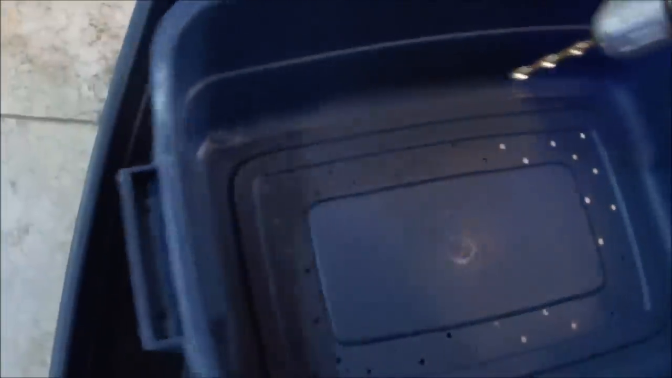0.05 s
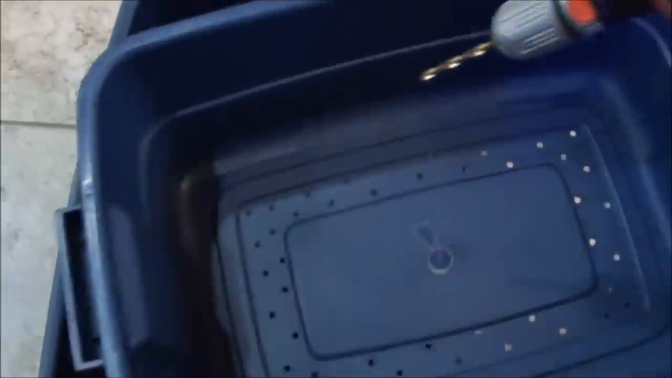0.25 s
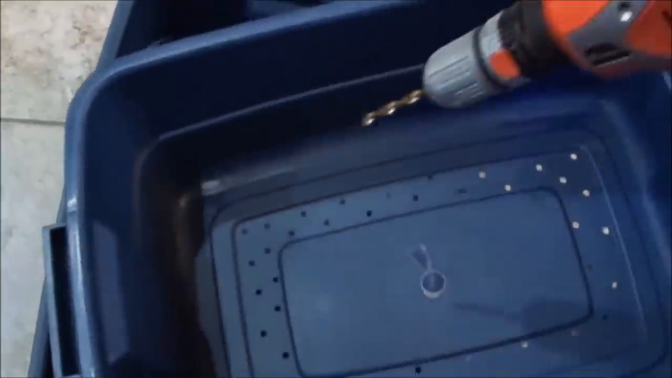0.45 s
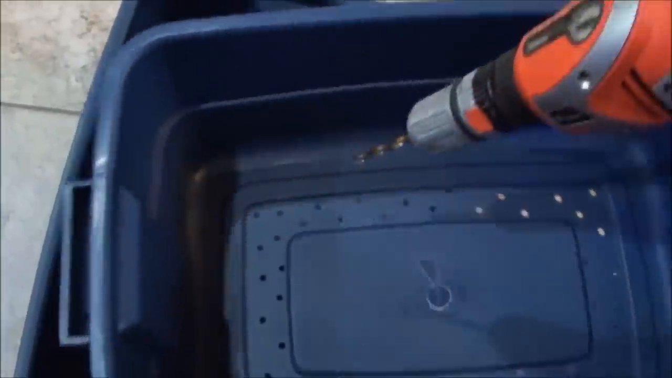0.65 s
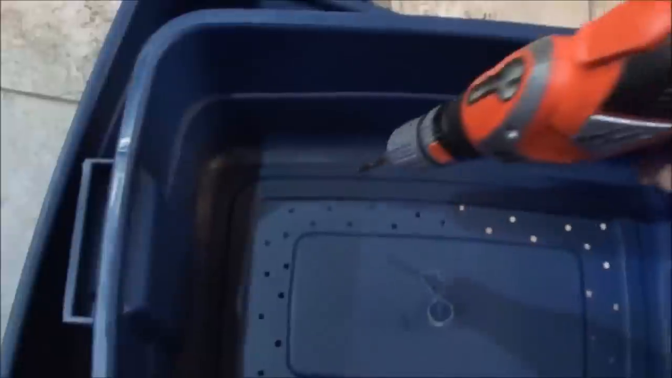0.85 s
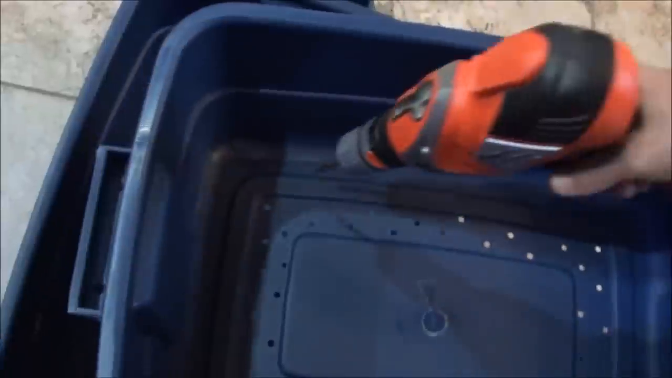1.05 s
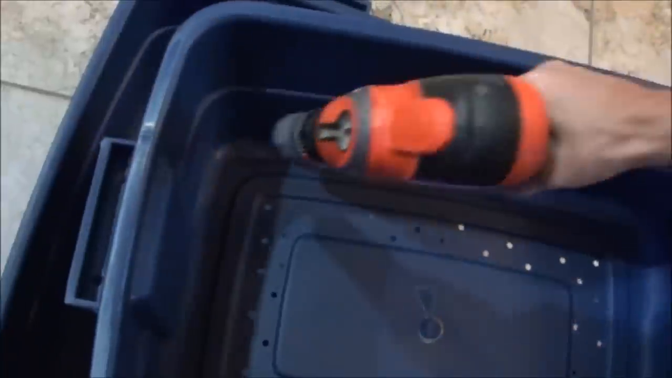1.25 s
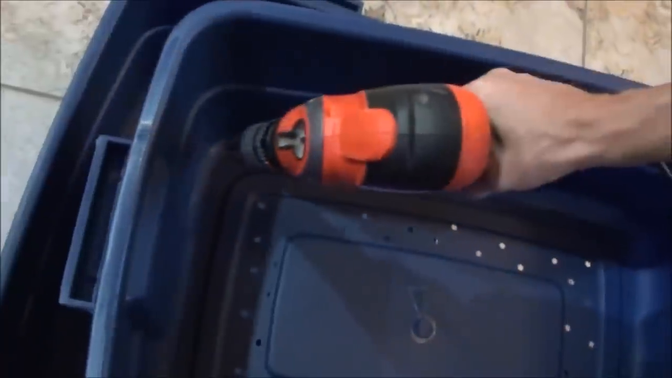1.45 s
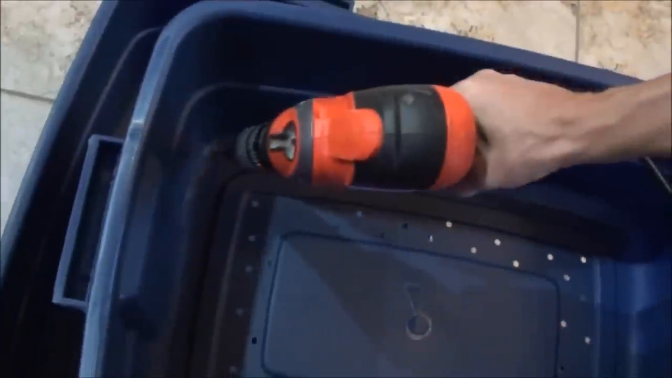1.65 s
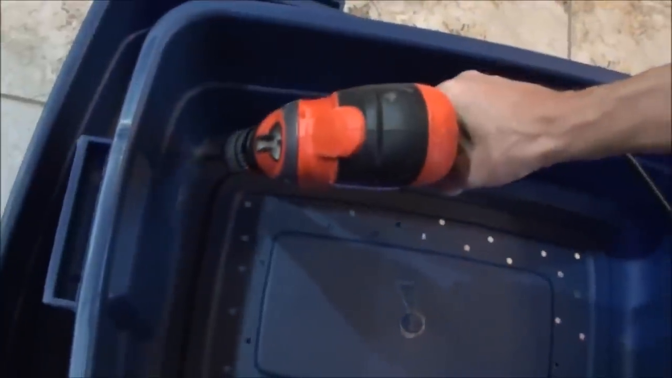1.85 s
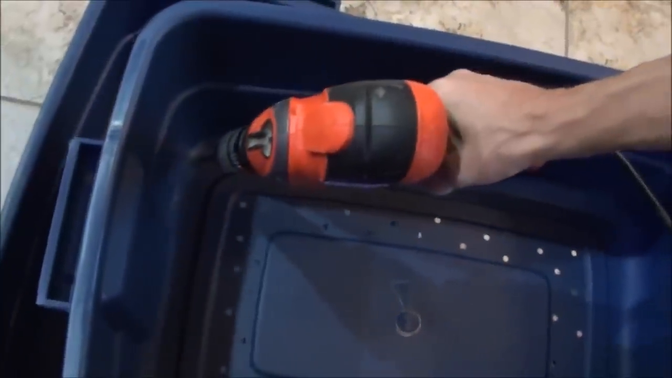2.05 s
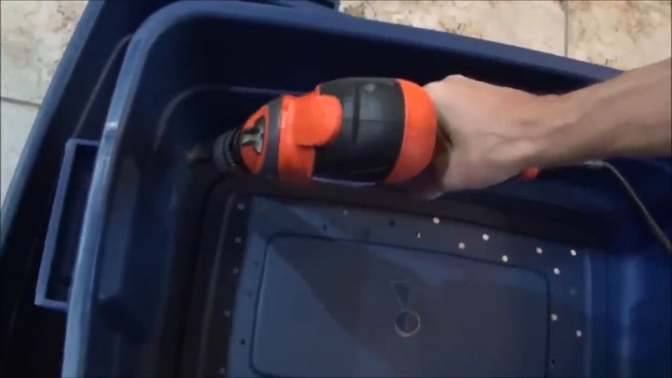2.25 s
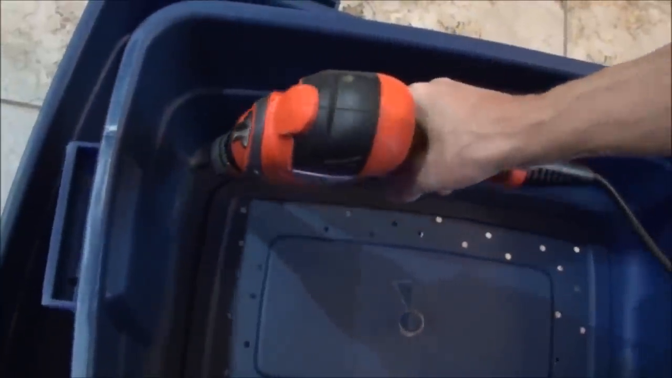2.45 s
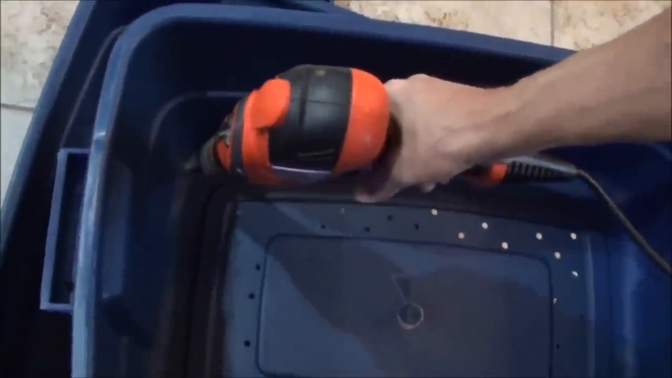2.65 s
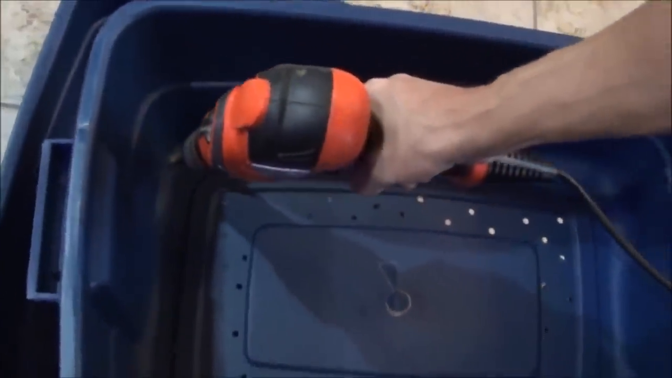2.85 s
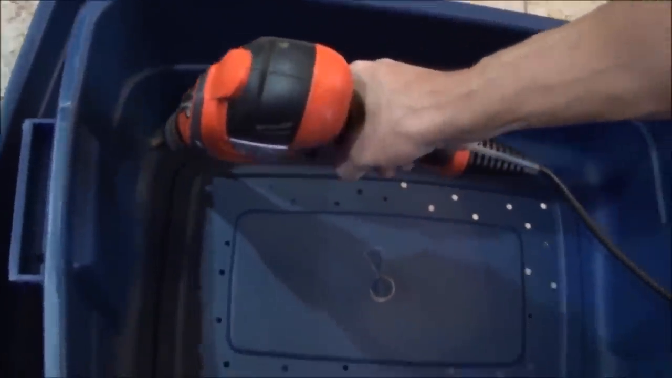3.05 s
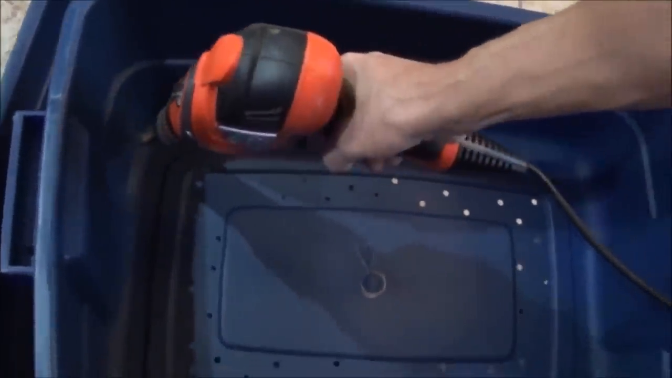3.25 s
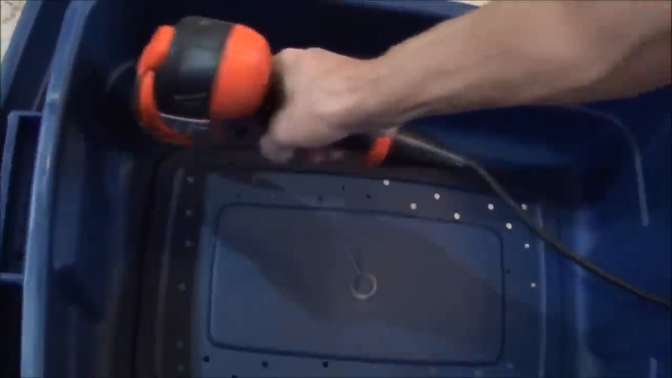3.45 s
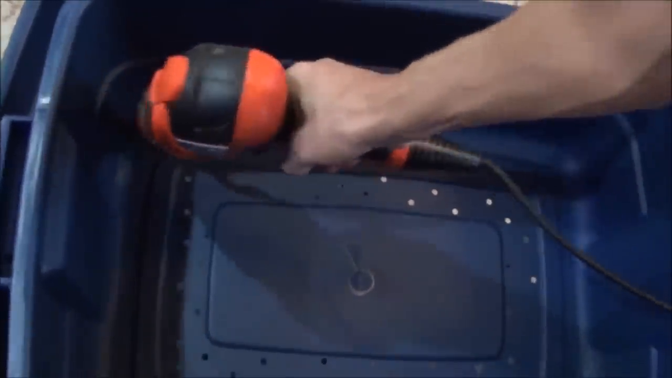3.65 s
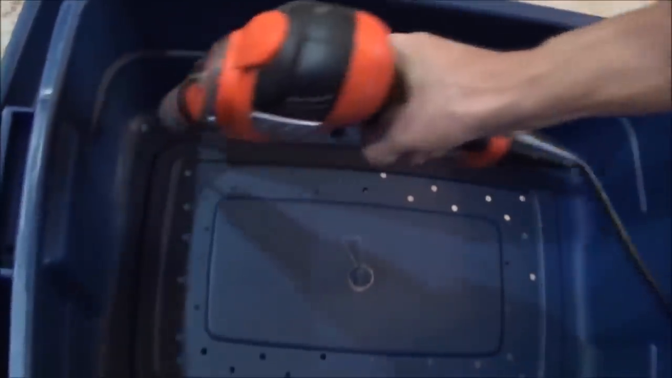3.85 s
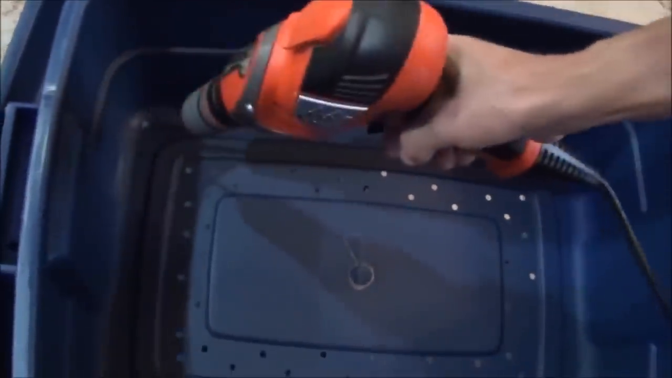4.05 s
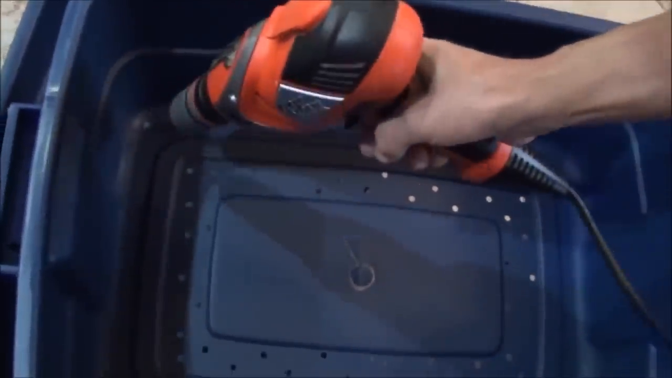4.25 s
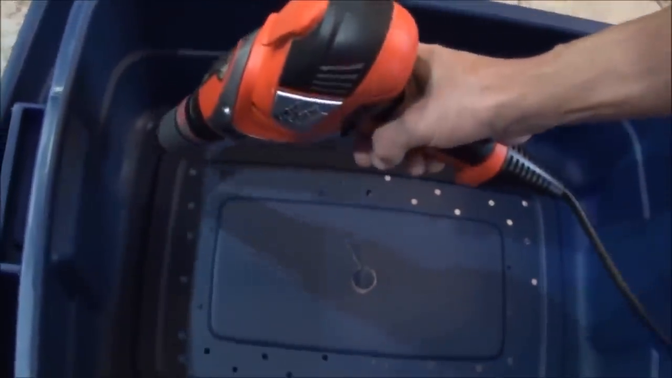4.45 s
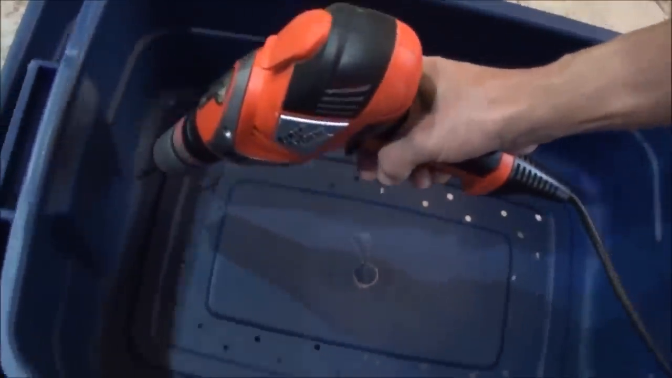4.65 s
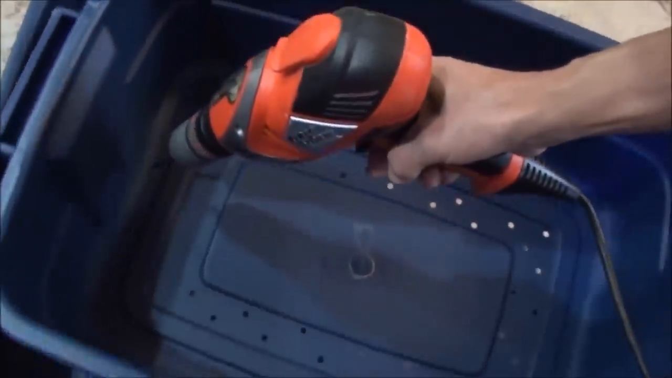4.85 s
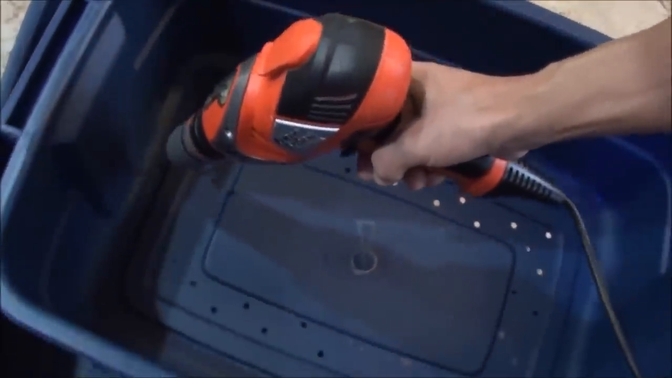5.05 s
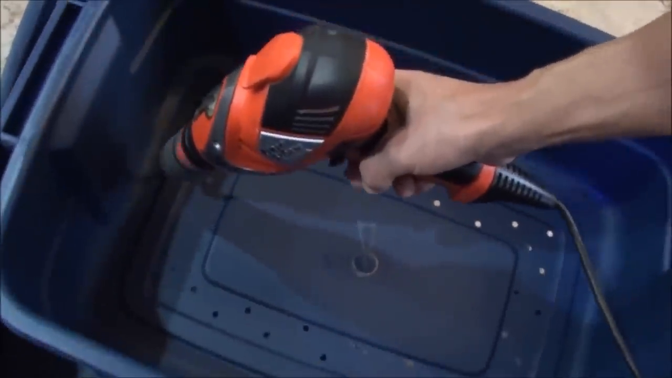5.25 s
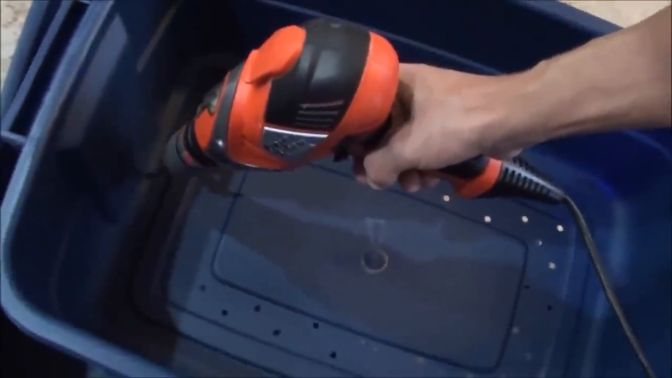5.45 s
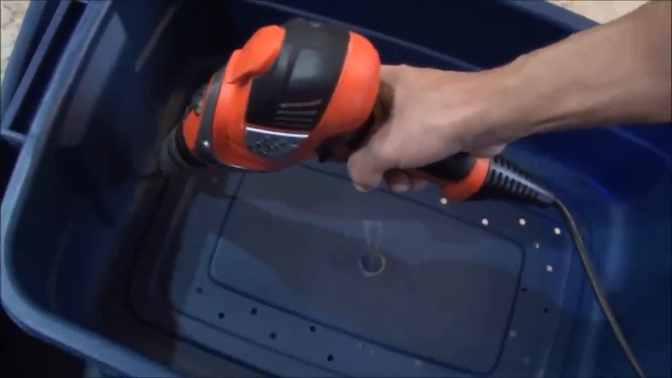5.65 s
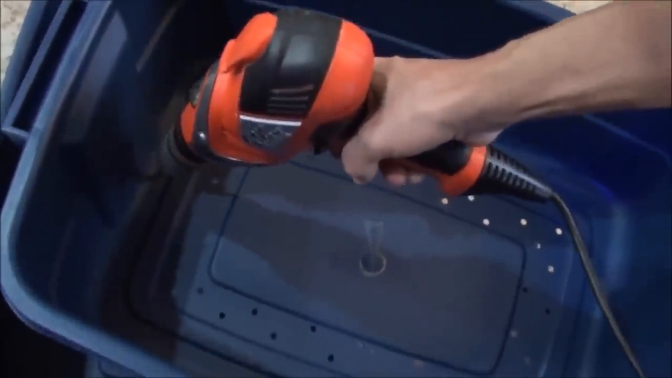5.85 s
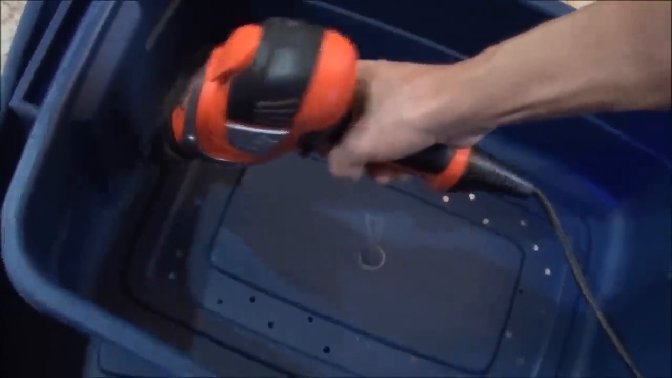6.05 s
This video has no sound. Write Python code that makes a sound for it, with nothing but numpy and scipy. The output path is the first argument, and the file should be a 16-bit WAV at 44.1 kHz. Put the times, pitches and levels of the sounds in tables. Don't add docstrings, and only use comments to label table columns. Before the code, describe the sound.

A drill bumps around a plastic bin over a quiet room, clicks, spins up to a loud shrill whir, winds down, then starts again.

```python
import sys
import numpy as np
from scipy import signal
from scipy.fft import rfft, irfft
from scipy.io import wavfile
from scipy.ndimage import uniform_filter1d

SR = 44100
rng = np.random.default_rng(int(sys.argv[2]) if len(sys.argv) > 2 else 0)


def unload_audio(sound):
    columns = np.transpose(np.atleast_2d(sound))
    steps = np.round(np.clip(columns, -1, 1) * 32767)
    wavfile.write(sys.argv[1], SR, steps.astype(np.int16))


def decibels_to_gain(level_db):
    exponent = np.asarray(level_db, float) / 20
    return 10 ** exponent


N = 269451
T = np.arange(N) / SR
HZ = np.fft.rfftfreq(N, 1 / SR)


def evened(x):
    return x / np.sqrt(np.mean(x ** 2) + 1e-20)


def read(points, hz=HZ):
    f, value = np.transpose(points)
    return np.interp(np.log(hz + 1), np.log(f + 1), value)


def curves(rows):
    s, *columns = np.transpose(rows)
    return [np.interp(T, s, c) for c in columns]


def add(mix, s, sound):
    part = mix[round(s * SR):][:len(sound)]
    part += sound[:len(part)]


def drift(hz):
    noise = uniform_filter1d(rng.standard_normal(N), int(SR / hz / 4))
    return evened(signal.lfilter([1], [1, -np.exp(-2 * np.pi * hz / SR)], noise))


def above(x, hz):
    return signal.lfilter(*signal.butter(3, hz, "high", fs=SR), x)


def resonate(x, hz, width):
    r = np.exp(-np.pi * width / SR)
    return signal.lfilter([1 - r], [1, -2 * r * np.cos(2 * np.pi * hz / SR), r * r], x)


def bump(hz, center, width):
    return 1 / (1 + (2 * (hz - center) / width) ** 2)


def pair(left, other, same):
    c = np.clip(read(same), 0, 1)
    return np.array([left, c * left + np.sqrt(1 - c ** 2) * other])


def banded(spectra, edges_hz, levels_db, span):
    lows = [0] + [1 / (1 + (HZ / e) ** 8) for e in edges_hz] + [1]
    bands = [irfft(spectra * np.sqrt(abs(b - a)), N) for a, b in zip(lows, lows[1:])]
    return sum(decibels_to_gain(db) * band / band[:, span].std() for db, band in zip(levels_db, bands))


def echoes(x, t60=.09, wet_db=-5, dull_hz=12000, rattle_db=0):
    taps = np.zeros((2, 8000))
    at = np.arange(60, 7960, 20) + rng.integers(0, 20, (2, 395))
    np.put_along_axis(taps, at, rng.choice([-1., 1.], at.shape) * decibels_to_gain(-60 * at / SR / t60), 1)
    taps = taps[0] + 0.89 * taps
    taps = signal.lfilter(*signal.butter(1, min(dull_hz, 20000), fs=SR), taps)
    taps *= decibels_to_gain(wet_db) / np.linalg.norm(taps[0])
    tail = signal.fftconvolve(x[None], taps, axes=1)[:, :N]
    return x + tail * decibels_to_gain(rattle_db * (drift(235) - 0.74))


# (time [s], trigger [0-1])
POWER = [
    (2.76, 1),
    (4.07, 1),
    (4.12, 0),
    (5.85, 0),
    (5.89, 1),
    (6.11, 1),
]
EDGES_HZ = [700, 2500, 10000]


def drill():
    hz = uniform_filter1d(speed(), 3000)
    power, = curves(POWER)
    running = T > SPIN_UP[0][0]
    unsteady = (.0004 + .0028 * power) * drift(60)
    turns = np.cumsum(hz * (1 + unsteady)) / SR / 40
    strain = power / (1 + (hz / 7000) ** 8)
    lines, wobble = shaft_tones(turns, hz, power, strain)
    body = housing(brush_hiss(turns, hz, power), lines, hz) + wobble
    sung = echoes(decibels_to_gain(3.5) * whine(turns, hz, power, strain) * running, t60=0.25, wet_db=-8)
    return running * banded(rfft(body), EDGES_HZ, parts_db(hz), running) + sung


# (time [s], whine [Hz])
SPIN_UP = [(2.76, 300), (2.95, 3520), (3.13, 6720), (3.2, 7540), (3.5, 11610), (3.6, 12540), (3.75, 13590),
           (3.9, 14390), (4.09, 15122)]
# (time [s], whine [Hz])
RESTART = [(5.87, 4350), (6.0, 7250), (6.065, 8900), (6.11, 9750)]


def speed():
    (up,), (again,), (off_s, off_hz) = curves(SPIN_UP), curves(RESTART), SPIN_UP[-1]
    equal_hz, coast_per_s = 11640.6, .312493
    angle = np.arctan(off_hz / equal_hz) - coast_per_s * np.maximum(T - off_s, 0)
    coast = equal_hz * np.tan(angle)
    return np.where(T < off_s, up, np.where(T < RESTART[0][0], coast, again))


# (frequency [Hz], level [dB])
VENT = [(1000, -58), (3500, -9), (5100, -29.5), (6000, -19), (7000, -15), (9700, -14), (10500, -20),
        (15000, -23)]
# (frequency [Hz], width [Hz], boost [dB])
VENT_MODES = [(4600, 250, 4), (5500, 150, 6), (6350, 250, 5), (6800, 200, 5), (7400, 300, 6),
              (8020, 200, 7), (8850, 200, 5), (9320, 300, 6), (10350, 200, 6), (11250, 150, 6),
              (11650, 250, 8), (12150, 300, 9), (13250, 300, 9), (14350, 350, 9)]
# (time [s], depth [dB], length [s])
DROPS = [(2.95, 9, .04), (3.058, -5, 0.045), (3.302, 1.5, .07), (3.498, -1, .03), (3.86, 1, 0.061),
         (4.015, 12, .012), (4.25, 3, 0.018), (4.34, -6, .015), (4.61, 3, 0.039), (4.643, 1, 0.011),
         (4.725, 7, 0.015), (4.898, 3, .012), (5.053, 1.5, .015), (5.283, 15, 0.019), (5.504, 0.5, 0.018),
         (5.54, 6, 0.019), (5.67, 5, 0.037), (5.98, 6, .025), (6.035, -4.5, .03), (6.1, 5, 0.027)]


def whine(turns, hz, power, strain):
    db = read(VENT, hz) + sum(boost * bump(hz, f, w) for f, w, boost in VENT_MODES)
    db += -8.5 * power / (1 + (hz / 13600) ** 4)
    db += curves(MESH)[0] - 2 * 2.5 * strain
    db -= sum(depth * np.exp(-((T - s) / length) ** 4) for s, depth, length in DROPS)
    return decibels_to_gain(db + (1.5 + 2.5 * power) * drift(40)) * np.cos(2 * np.pi * 40 * turns)


# (times per turn, level [dB])
GEAR = [(9, -19), (12, -24), (18, -17.5), (27, -20), (36, -19)]
# (times per turn, level
# [dB])
BARS = [(12, -30), (16, -32), (24, -24), (36, -19.5), (41, -22), (48, -21), (60, -22), (72, -18), (80, -14),
        (84, -18)]
# (time [s], level [dB])
MESH = [
    (5.8, 0),
    (5.86, -8),
    (5.95, -7),
    (6.01, 0),
    (6.06, -2),
]
# (times per turn, time [s], length [s], change [dB])
TONE_SWELLS = [(9, 2.95, .05, -8), (27, 2.97, .04, -6), (27, 3.32, .1, -9), (27, 3.56, .07, 5),
               (18, 3.68, .06, 9), (36, 3.48, .1, -7), (12, 3.2, .04, 6), (18, 3.37, .05, 4),
               (18, 3.52, .07, -7), (18, 6.0, .05, -8), (80, 5.8, .06, -9), (36, 5.45, .08, -5),
               (24, 4.85, .12, -5), (24, 5.32, .08, 7), (36, 4.62, .2, -6), (36, 5.23, .04, 3),
               (48, 5.52, .03, 6), (36, 5.72, .08, 6), (36, 5.85, .03, -6), (12, 6.05, .04, 9),
               (18, 6.09, .04, 2), (36, 6.09, .04, 5), (27, 6.03, .06, -7), (18, 3.45, .04, -6),
               (18, 3.27, .03, -5), (18, 3.2, .02, -4), (12, 3.3, .05, 5), (9, 3.17, .06, -4),
               (18, 3.32, .03, -5), (16, 4.77, .06, 10), (24, 5.12, .08, -7), (24, 5.46, .05, 5),
               (36, 5.03, .04, 4), (12, 5.96, .05, -5), (72, 5.82, .07, -8), (84, 5.82, .07, -8),
               (24, 5.31, .05, 5), (18, 6.07, .02, 5), (36, 6.07, .03, 3), (12, 3.02, .05, 4),
               (18, 3.23, .04, 4)]


def shaft_tones(turns, hz, power, strain):
    flutter, shake = drift(30), drift(90)

    def order(k, db):
        change_db = sum(d * np.exp(-((T - s) / length) ** 2) for o, s, length, d in TONE_SWELLS if o == k)
        level = decibels_to_gain(db + change_db + (1.6 - .2 * power) * np.roll(flutter, 997 * k))
        phase = 2 * np.pi * k * turns + .85 * power * np.roll(shake, 1499 * k)
        return level * np.cos(phase) * (k * hz / 40 < 16000)

    teeth = power * decibels_to_gain(2.5 * strain + curves(MESH)[0]) * sum(order(*o) for o in GEAR)
    bars = (1 - power) * sum(order(*o) for o in BARS)
    wobble = (1 - power) * order(2, -21.5) / (1 + (11500 / hz) ** 8)
    return teeth + bars, wobble


# (frequency [Hz], likeness [0-1])
SAME_DRILL = [(60, 0.97), (180, 0.98), (550, 0.94), (1650, 1), (2500, 0.91), (4970, 0.92), (8500, 0.92),
              (11000, 1), (15000, 1)]


def brush_hiss(turns, hz, power):
    throb = 1 + 0.086 * np.cos(2 * np.pi * turns) + 0.095 * np.cos(8 * np.pi * turns)
    mains_depth = 0.39 * power / (1 + (hz / 3800) ** 2)
    throb *= 1 + mains_depth * np.cos(2 * np.pi * 119.8 * T)
    sparks = decibels_to_gain((-0.4 + 0.5 * power) * drift(320) + 1.0 * drift(31))
    return pair(*rfft(rng.standard_normal((2, N)) * throb * sparks), SAME_DRILL)


# (frequency [Hz], level [dB per Hz])
HISS = [(35, -72), (60, -42), (86, -32), (359, -14), (709, -13), (831, -9), (1340, 0), (1920, -6.5),
        (4350, -3), (5330, 1), (8020, 3), (13500, -17)]
# (frequency [Hz], width [Hz], boost [dB])
HOUSING = [(696, 184, 4), (996, 63, 2.5), (1510, 910, 5), (2080, 320, 2.5), (3000, 1200, 1.5),
           (4366, 1270, 6), (5990, 120, 4), (6000, 5700, -5.5), (6140, 940, 0), (7240, 340, 4.5),
           (8000, 110, 2.5), (9300, 130, 5.5), (11730, 330, 5.5), (14100, 550, 5)]


def housing(hiss, lines, hz):
    def shell(depth, shift=1):
        modes_db = sum(db * bump(HZ, f * shift, w) if shift == 1 else
                       db / (1 + (2 * (HZ - f * shift) / w) ** 2) for f, w, db in HOUSING)
        return evened(decibels_to_gain(read(HISS) + depth * modes_db))

    grip_shift, grip_per_s = .025, 3
    grip = .5 + .5 * np.tanh(drift(grip_per_s))
    bare = grip * irfft(hiss * shell(2.47, 1 - grip_shift), N)
    bare += (1 - grip) * irfft(hiss * shell(2.8, 1 + grip_shift), N)
    most_wind = .9 + 0.074 * np.tanh(drift(5.8))
    wind = np.clip((hz - 2500) / 7000 + 0.23 * drift(4.9), 0, most_wind)
    body = np.sqrt(1 - wind) * bare + np.sqrt(wind) * irfft(hiss * shell(0.83), N)
    clear = 1.7 * np.exp(-((hz - 8500) / 5800) ** 2)
    return body + clear * irfft(rfft(lines) * shell(1.5) * decibels_to_gain(3), N)


# (time [s], motor level [dB], bit pressure [0-1])
WORK = [(2.83, -27, 0.44), (2.89, -19, 0), (2.98, -11.5, 0), (3.18, -13.5, 0.22), (3.28, -16, 0.26),
        (3.4, -13.5, 0.64), (3.68, -14.5, 0.62), (3.9, -14, 0.98), (4.08, -14.5, 0.57), (4.4, -15, 0.56),
        (4.78, -16, 0.65), (4.9, -18.5, 0.59), (5.2, -20, 0.57), (5.48, -20, 0.44), (5.735, -21.5, 0.2),
        (5.76, -15.5, 0.03), (5.9, -13, 0.01), (6.08, -14.5, 0.1)]
# (level [dB], share of the motor level, added by full pressure [dB])
PARTS = [
    (-36, 0.28, 14.5),
    (-30, 0.53, 5.5),
    (-15, 1, 0.4),
    (-25, 0.98, 1),
]


def parts_db(hz):
    motor_db, pressure = curves(WORK)
    levels = [db + share * (motor_db + 15) + press_db * pressure for db, share, press_db in PARTS]
    rumble, wall, shell, air = levels
    wall = wall + 5 * np.exp(-((T - 4.3) / 0.45) ** 4)
    air = air + 30 * np.minimum(np.log2(hz / 3980), 0)
    return rumble, wall, shell, air


# (time [s], length [s], level [dB], pitch [Hz], width [Hz])
GROANS = [(2.72, 0.35, -36.5, 298, 126), (2.879, 0.22, -21.5, 2930, 570), (5.86, 0.17, -22, 4500, 300),
          (5.89, 0.15, -20, 4300, 300), (5.74, 0.18, -27, 4700, 500), (5.997, 0.12, -21, 2460, 330),
          (4.92, 0.17, -27, 1400, 250), (4.5, 0.19, -29, 1560, 190), (3.499, 0.46, -21.5, 1020, 220),
          (3.56, 0.56, -31, 301, 116), (3.57, 0.15, -45, 135, 40), (5.6, 0.24, -52, 140, 40),
          (4.4, 0.61, -30.5, 816, 130), (2.9, 0.22, -20, 4900, 390), (2.72, 0.49, -23.5, 8050, 260),
          (2.75, 0.074, -34, 8100, 350), (2.75, 0.17, -35, 4750, 400), (2.83, 0.11, -29, 1300, 360),
          (5.753, 0.24, -37.5, 302, 110), (3.953, 0.67, -26, 1417, 170), (4.85, 0.08, -14.5, 9470, 170),
          (5.73, 0.072, -20, 9600, 500), (5.5, 0.36, -24, 9300, 200), (5.73, .16, -28, 6500, 200),
          (5.87, 0.11, -23, 3000, 230), (5.76, .12, -29, 2600, 900), (6.6, .07, -25, 8600, 250),
          (2.75, 0.15, -29.5, 3000, 1100), (5.86, 0.2, -22, 9500, 500), (3.16, 0.12, -26, 2350, 200),
          (3, .2, -27, 3400, 300), (3.14, 0.077, -21, 4900, 200), (2.9, 0.13, -27, 3100, 200),
          (2.96, .11, -26, 4400, 250), (3.05, .07, -27, 1350, 200), (3.98, 0.48, -26, 4450, 250),
          (4.46, .16, -27, 3500, 250), (4.1, 0.21, -30, 700, 91), (4.05, 0.14, -27, 2160, 230),
          (5.12, .4, -35, 9350, 250), (5.1, 0.17, -33, 4300, 300)]


def groans():
    return whistles(GROANS)


# (time [s], level [dB], color [Hz], fade by 60 dB [s])
SNAPS = [(2.629, -13, 3000, 0.073), (2.632, -5.5, 3000, 0.047), (2.636, -1.5, 2800, 0.022),
         (2.757, -7, 4650, 0.023), (2.759, -4, 5250, 0.016), (2.8425, -13, 3500, 0.027),
         (2.859, -12, 3000, 0.023), (2.9106, -7, 6000, 0.079), (5.877, -3, 4730, 0.025)]
# (time [s], level [dB])
CHATTER = [(5.564, -7), (5.581, -13), (5.615, -12), (5.689, -9), (5.733, -13), (5.754, -9), (5.784, -14),
           (5.84, -7), (5.925, -7), (5.944, -9), (5.988, -9), (6.012, -9), (6.06, -9)]
# (time [s], level [dB])
CLASHES = [
    (2.8927, -6),
    (2.916, -1),
    (2.9294, 1),
    (2.958, -2),
    (2.9752, -8),
    (3.034, -9),
]


def gear_snaps():
    snaps = SNAPS + [(s, db, 8000, .04) for s, db in CHATTER]
    snaps = snaps + [(s, db - 6.5, 4000, .02) for s, db in CLASHES]
    return strike([(s, db - 26 * min(3000 / hz, 1) ** -.7, db, hz, t60) for s, db, hz, t60 in snaps])


# (time [s], ring [dB], crack [dB], crack color [Hz], crack fade by 60 dB [s])
KNOCKS = [(.15, -8.5, -1.5, 1330, 0.014), (.259, -24, -13, 250, 0.063), (.494, -25.5, -30, 2000, 0.15),
          (.683, -50, -22, 1500, .05), (.707, -41, -15.5, 2250, 0.24), (.734, -40, -23, 2030, 0.06),
          (.874, -14, -6, 1770, 0.069), (.929, -25, -16, 870, 0.15), (1.075, -24, -34, 800, .06),
          (1.295, -27, -5.5, 1330, 0.02), (2.031, -39, -33, 1200, 0.12), (5.432, -48, -19.5, 171, 0.4)]


def knocks():
    return strike(KNOCKS)


# (frequency [Hz], level [dB], decay value [s]; a mode fades by 60 dB in 0.38 times
# this, at most 0.2 s)
TUB = [(319, 5.5, 0.22), (509, 9, 0.12), (748, -6, 0.32), (1020, 4.5, 0.098), (1380, 7, 0.075),
       (1830, 21, 0.02)]


def strike(blows):
    out, t = np.zeros(N), T[:8000]
    shifts = rng.uniform(.96, 1.04, (len(blows), len(TUB)))
    noises = rng.standard_normal((len(blows), 8000))
    for (s, ring_db, crack_db, hz, t60), noise, shift in zip(blows, noises, shifts):
        ring = sum(decibels_to_gain(d - 60 * t / min(0.38 * decay, .2)) * np.sin(2 * np.pi * f * k * t)
                   for (f, d, decay), k in zip(TUB, shift))
        crack = evened(above(resonate(noise, min(hz, 15000), 3.0 * hz), 0.18 * hz))
        crack = crack * (decibels_to_gain(-60 * t / t60) + 1.17 * decibels_to_gain(-60 * t / 0.01))
        ring = decibels_to_gain(ring_db - 2.5) * ring * np.minimum(t / 0.0052, 1)
        add(out, s, ring + decibels_to_gain(crack_db - 5.0) * crack * np.minimum(t * hz / 1.9, 1))
    return signal.lfilter(*signal.butter(2, 9500, fs=SR), out)


# (time [s], length [s], level [dB], pitch [Hz],
# width [Hz])
SQUEAKS = [(.688, 0.062, -17, 1980, 900), (.698, 0.039, -16.5, 300, 83), (2.3, 0.063, -38, 240, 130),
           (2.63, 0.088, -38.5, 130, 97), (.2, .2, -32, 290, 80), (.255, .03, -26, 520, 150),
           (1.297, 0.028, -27, 450, 350), (2.63, 0.068, -35.5, 187, 75), (.248, 0.035, -19, 340, 140),
           (.95, 0.091, -23.5, 1970, 2400), (1.293, 0.0087, -15.5, 1400, 790), (.16, 0.12, -32, 770, 120),
           (.732, 0.049, -20, 307, 75), (1.5, 0.09, -43, 3030, 450), (1.4, 0.09, -45, 4500, 350),
           (1.47, 0.12, -41, 6400, 1300), (2, 0.12, -46, 4640, 600), (2, .1, -49, 6700, 500),
           (2.2, .12, -48, 5500, 900), (2.282, 0.092, -39, 3610, 220), (2.36, 0.098, -47, 3600, 150),
           (2.558, 0.064, -40, 3600, 200), (2.564, .06, -42, 6500, 900)]


def squeaks():
    return whistles(SQUEAKS)


def whistles(rows):
    out, lumps = np.zeros(N), decibels_to_gain(1.8 * drift(60) - 1)
    for (s, length, db, hz, width), noise in zip(rows, rng.standard_normal((len(rows), SR))):
        n = int(length * SR)
        tone = resonate(resonate(noise[:n + 2000], hz, width), hz, width)[2000:]
        swell = signal.windows.tukey(n, .9) * lumps[int(17 * hz) % SR:][:n]
        add(out, s, decibels_to_gain(db) * evened(tone) * swell)
    return out


# (time [s], level [dB])
DRAG = [(0, -33), (.11, -35), (.318, -31.5), (.6, -35), (.65, -31.5), (.866, -34), (.918, -27),
        (1.086, -32.5), (1.25, -40), (1.456, -36), (1.624, -39), (1.722, -45.5), (1.95, -44.5),
        (2.264, -42.5), (2.432, -44.5), (2.636, -45), (2.696, -51), (2.76, -38)]
# (level [dB], share of the drag level)
DRAG_PARTS = [
    (-38.5, 0.96),
    (-42, 0.95),
    (-44, 0.6),
]
# (frequency [Hz], level [dB per Hz])
RUB = [(18, -60), (30, -26), (81, -10), (152, -9), (237, -1.5), (370, 0), (421, -6), (749, -9), (1080, -5),
       (2130, -10.5), (3900, -19.5), (7690, -18.5), (15600, -37.5)]
# (frequency [Hz], likeness [0-1])
SAME_HAND = [(60, 0.95), (180, 1), (550, 0.9), (1650, 0.7), (4970, 0.7), (15000, 1)]


def handling():
    grains = rng.standard_normal((2, N)) * decibels_to_gain(0.44 * drift(104) + 1.0 * drift(7.6))
    drone = 1 + 0.41 * bump(HZ, 310, 60)
    spectra = pair(*rfft(grains), SAME_HAND) * decibels_to_gain(read(RUB)) * drone
    levels_db = [db + share * (curves(DRAG)[0] + 38) for db, share in DRAG_PARTS]
    return banded(spectra, [600, 3000], levels_db, T > 0) * (T < 2.8)


# (time [s], length [s], level [dB])
RUSTLES = [(.25, .07, -44), (0.337, 0.12, -35), (0.519, 0.042, -38.5), (0.619, 0.077, -34),
           (0.674, 0.082, -26.5), (0.882, 0.21, -34), (1.465, 0.1, -40), (2.007, 0.12, -47),
           (2.252, .15, -49)]


def rustles():
    return whistles([(*row, 7560, 4500) for row in RUSTLES])


# (time [s], peak [dB], pitch [Hz])
TICKS = [(0.802, -37, 10500), (1.05, -36, 5030), (1.077, -31, 7340), (1.093, -30, 7500), (1.13, -35, 6500),
         (1.15, -32, 7400), (1.183, -30.5, 7440), (2.416, -41, 8000), (5.3052, -12.5, 6900),
         (2.758, -17, 4900), (2.759, -19, 8000)]


def ticks():
    out, t = np.zeros(N), T[:600]
    for (s, db, hz), noise in zip(TICKS, rng.standard_normal((len(TICKS), 600))):
        add(out, s, decibels_to_gain(db + 4.5 - 60 * t / 0.031) * evened(resonate(noise, hz, 1100)))
    return out


# (frequency [Hz], level [dB per Hz])
ROOM = [(15, -46), (25, -35.5), (110, -16), (148, -24.5), (194, 0.5), (234, 6.5), (744, -5.5), (948, -13),
        (7740, -10), (8390, -14.5), (15600, -11)]
# (frequency [Hz], level [dB])
HUM = [(8400, -61)]


def room():
    floor = irfft(pair(*rfft(rng.standard_normal((2, N))), SAME_HAND) * decibels_to_gain(read(ROOM)), N)
    whistle = sum(decibels_to_gain(db + 3 + 2 * drift(8)) * np.cos(2 * np.pi * f * T + drift(10)) for f, db in HUM)
    return decibels_to_gain(-44.5) * evened(floor) + whistle


def scene():
    tool = above(drill(), 218)
    blows = above(gear_snaps() + knocks(), 194)
    rubbing = above(groans() + squeaks() + rustles(), 96)
    small = echoes(blows + ticks() + rubbing, t60=0.24, wet_db=-7, dull_hz=4560, rattle_db=4.5)
    return tool + handling() + room() + small


def roll_off(x):
    return signal.sosfilt(signal.butter(12, 15740, fs=SR, output="sos"), x)


# (frequency [Hz], left minus right [dB])
LEAN = [(60, -2), (180, -2), (550, -3), (1650, -0.5), (4970, -1), (15000, 0)]


def record(dry):
    lean = decibels_to_gain(np.outer([.5, -.5], read(LEAN))) * (HZ < 15750) * (HZ > 25)
    x = irfft(rfft(np.tanh(0.74 * dry) / 0.83) * lean, N)
    return roll_off(np.clip(x, -1, 1))


dry = scene()
out = record(dry)
unload_audio(out)
```